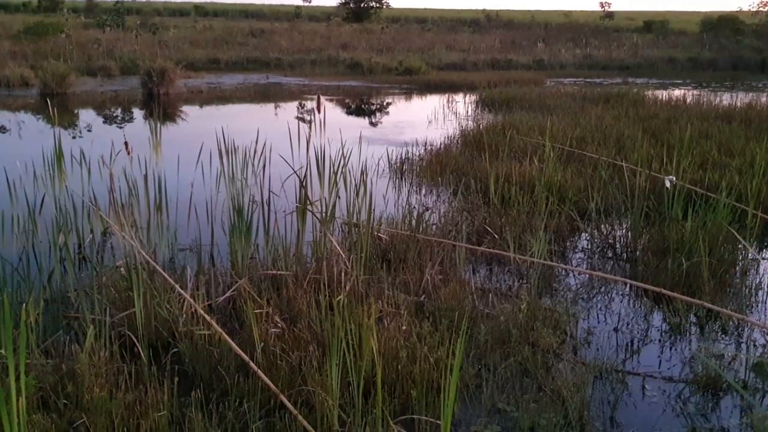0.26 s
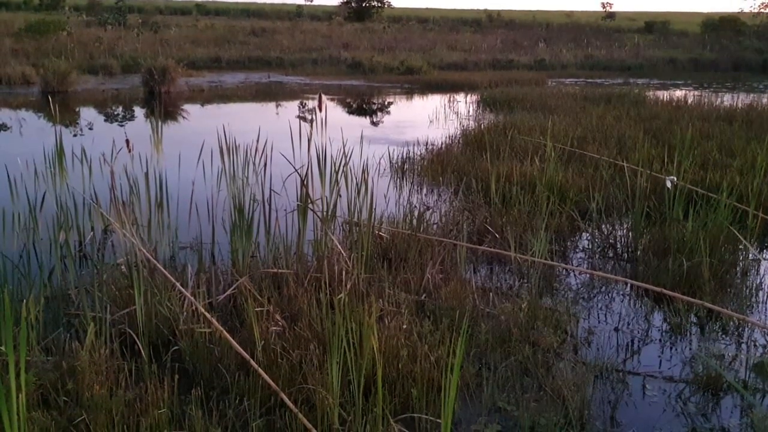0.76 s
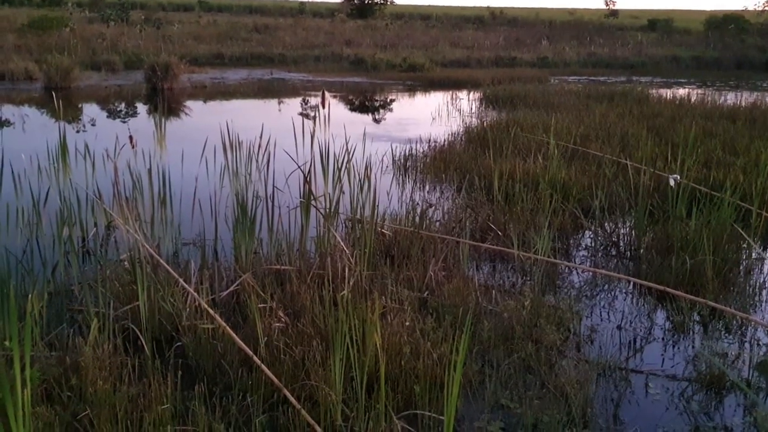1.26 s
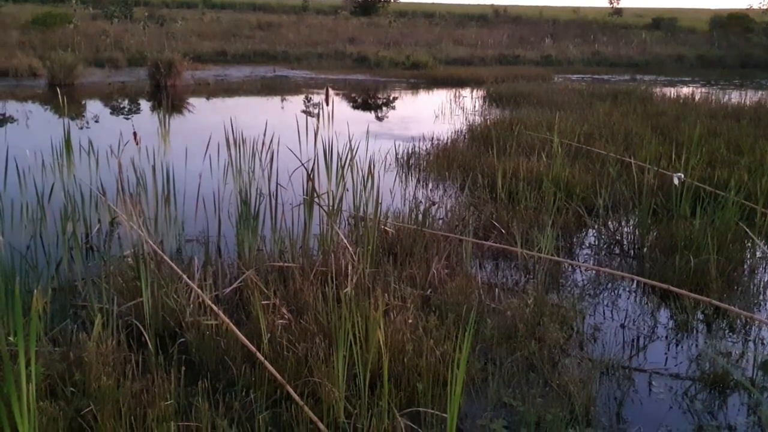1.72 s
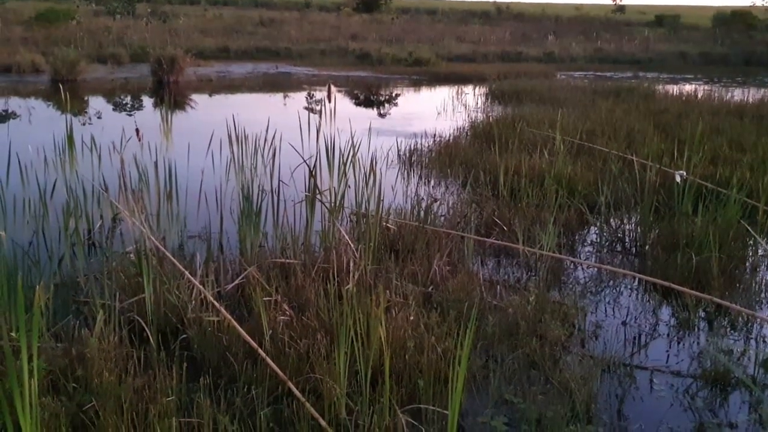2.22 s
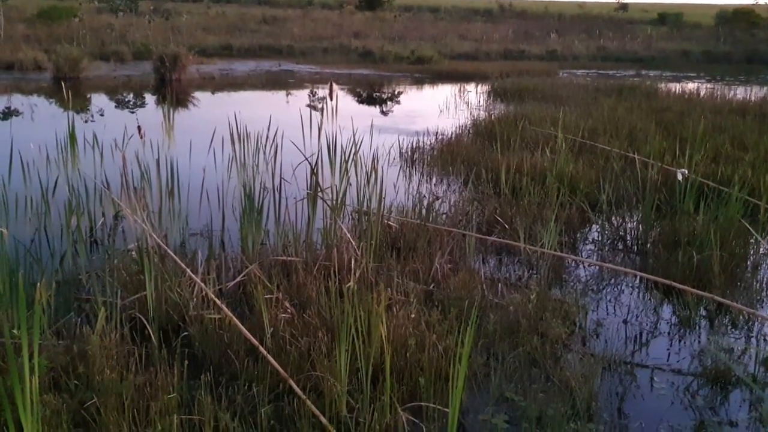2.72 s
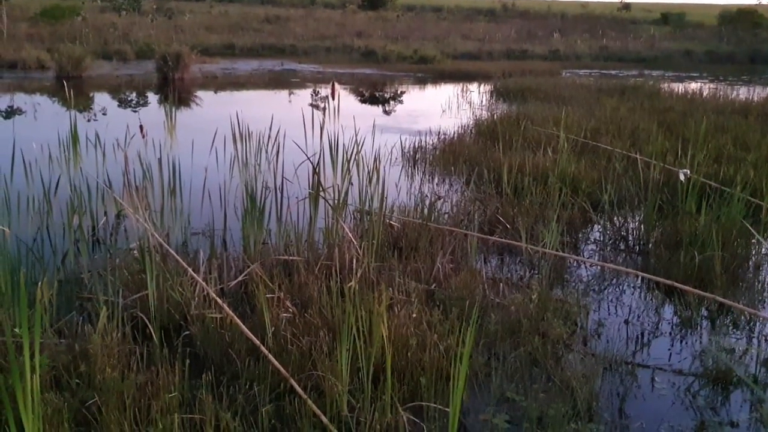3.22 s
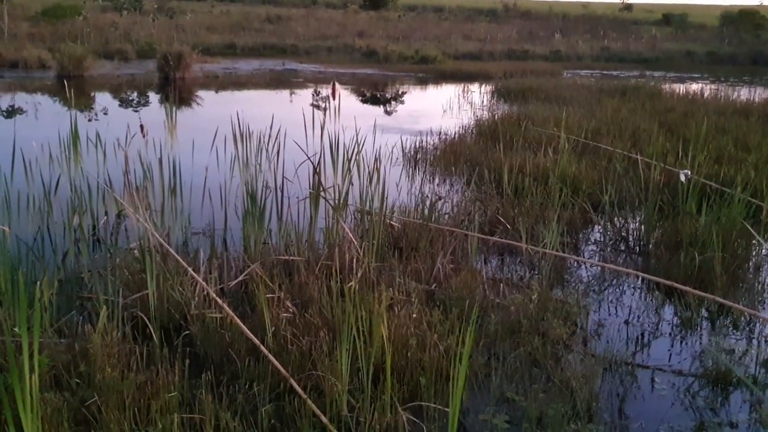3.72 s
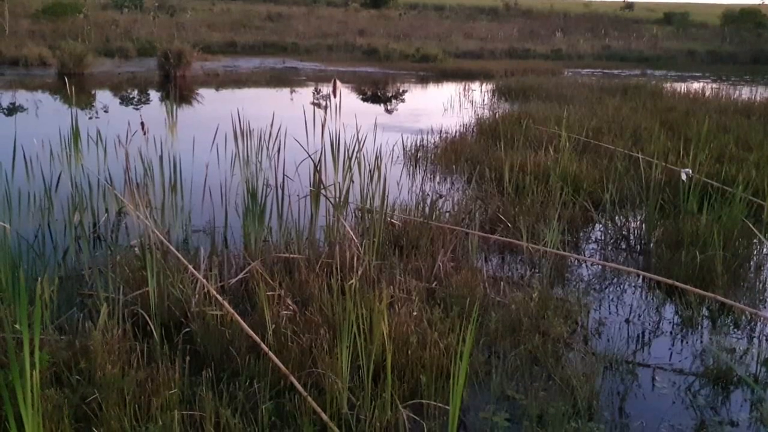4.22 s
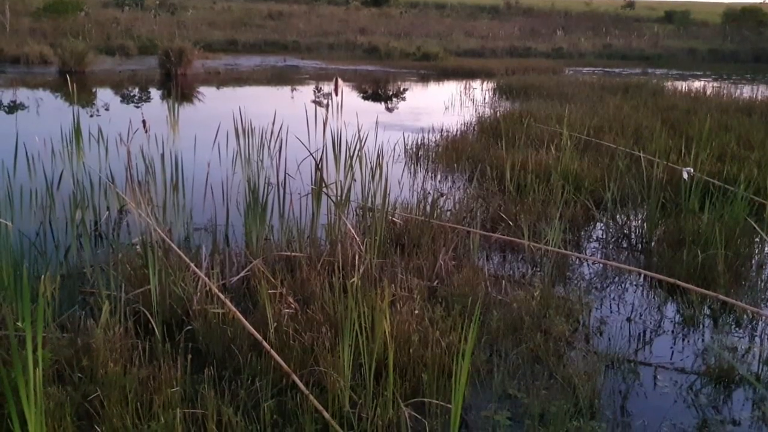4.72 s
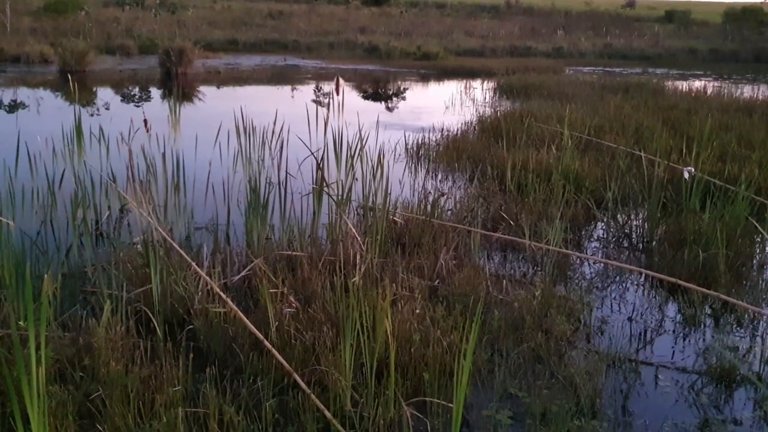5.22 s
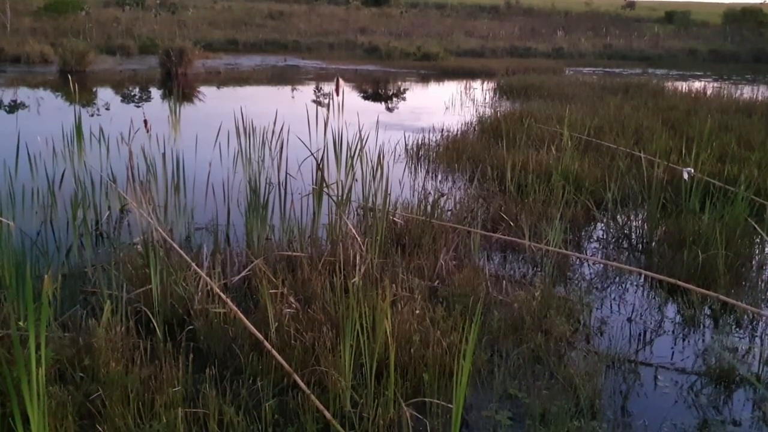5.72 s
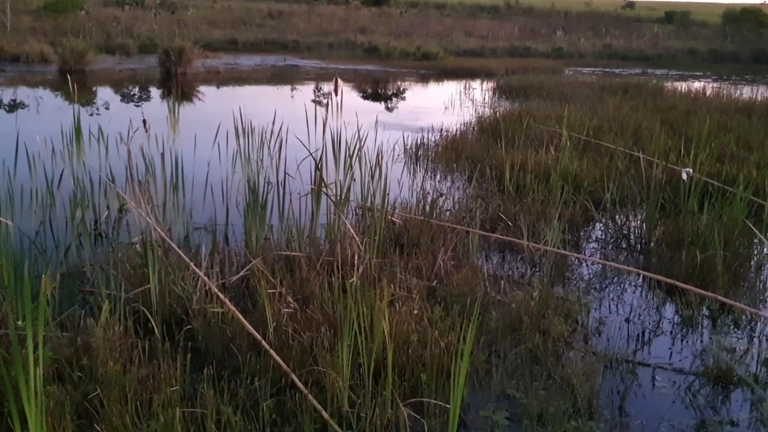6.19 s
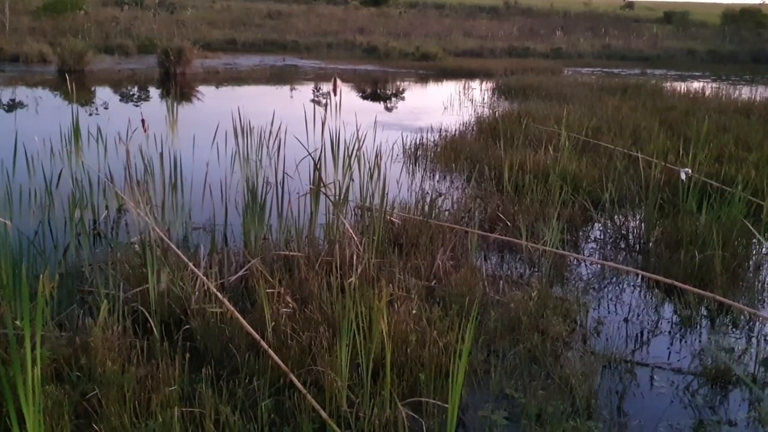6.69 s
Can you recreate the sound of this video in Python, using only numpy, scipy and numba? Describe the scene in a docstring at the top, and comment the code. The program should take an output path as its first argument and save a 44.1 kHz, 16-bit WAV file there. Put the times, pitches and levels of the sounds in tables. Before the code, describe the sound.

Dusk marsh chorus: a near frog's brief rattling croaks, a hoarser rasp answering between, dense buzzing trills all around, thin insect shimmer above.

```python
"""Frog chorus at a reedy lagoon

Dusk: a near frog repeats short rattling croaks, and a hoarser one rasps, mostly between them; both are runs of
brief tone pulses. Around them small frogs buzz in overlapping trills: click trains ringing vocal sac resonances.
Other frogs cluck, whine, squeak and grunt as pulses or sliding tones; far moans and small knocks are shaped noise.
A katydid and a cricket chirr as gated noise. Two closely spaced microphones hear it over faint low air noise."""
import sys
import numpy as np
from scipy import signal
from scipy.fft import rfft, irfft, next_fast_len
from scipy.io import wavfile
from scipy.ndimage import map_coordinates
from numba import njit

SR = 44100
rng = np.random.default_rng(int(sys.argv[2]) if len(sys.argv) > 2 else 0)


def generate_wav(signal):
    """Clip the signal to [-1, 1] and save it as 16-bit WAV at the path in sys.argv[1]."""
    frames = np.transpose(np.atleast_2d(signal))
    scaled = np.clip(frames, -1, 1) * 32767
    pcm = np.round(scaled).astype(np.int16)
    wavfile.write(sys.argv[1], SR, pcm)


N = 306495
T = np.arange(N) / SR  # s


def undb(db):
    """Decibels to gain."""
    return 10 ** (np.asarray(db) / 20)


def unit(x):
    """Scale to rms 1."""
    return x / np.sqrt(np.mean(x ** 2) + 1e-20)


def colour(x, points):
    """Filter by a spectrum of (Hz, dB) points, joined by straight lines over log frequency."""
    hz, db = np.transpose(points)
    size = next_fast_len(N + 4096)
    f = np.maximum(np.arange(size // 2 + 1) * SR / size, 1)
    gain = undb(np.interp(np.log(f), np.log(hz), db))
    return irfft(rfft(x, size) * gain, size)[..., :N]


def walk(rate):
    """Random drift with a spread near 1, heading for a new value rate times a second."""
    knots = rng.standard_normal(2048)
    return np.interp(T * rate, np.arange(len(knots)), knots)


def swell(start, end, edge):
    """A window that opens and closes smoothly over edge seconds."""
    return np.sin(np.pi / 2 * np.clip(np.minimum(T - start, end - T) / edge, 0, 1))


def beat(rate, decay):
    """A gate that snaps open once a cycle and dies away over a share of the cycle."""
    phase = np.cumsum(rate * np.ones(N)) / SR + rng.random()
    return np.exp(-(phase % 1) / decay)


def clicks(rate, scatter_db):
    """One click a cycle, each of its own strength, shared between two samples."""
    phase = np.cumsum(rate) / SR + rng.random()
    cycle = np.floor(phase)
    size = np.diff(cycle, prepend=cycle[0]) * undb(scatter_db * rng.standard_normal(N))
    early = size * np.minimum((phase - cycle) * SR / rate, 1)
    return size - early + np.roll(early, -1)


def flutter(x, gap=.001, stray=.1, after_db=-3.5, count=2):
    """Every click is followed at once by weaker flaps of the membrane; their spacing (gap, s) strays."""
    late = gap * (1 + stray * walk(45))
    flaps = x
    for k in range(1, count + 1):
        flaps = flaps + undb(after_db * k) * map_coordinates(x, [(T - k * late) * SR], order=3)
    return flaps


@njit
def resonate(x, hz, width):
    """Band-pass whose centre may move, gain 1 at the centre."""
    y, b, l = np.empty(len(x)), 0., 0.
    for i in range(len(x)):
        g, k = np.tan(np.pi * hz[i] / SR), width / hz[i]
        v = (b + g * (x[i] + 1e-18 - l)) / (1 + g * (g + k))
        b, l, y[i] = 2 * v - b, l + 2 * g * v, k * v
    return y


def ring(x, hz, width):
    """A resonance that acts twice, so its flanks are steep; rms 1."""
    hz = hz * np.ones(N)
    once = resonate(x, hz, float(width))
    return unit(resonate(once, hz, float(width)))


def add(out, s, hz, db, half):
    """Add one pulse of a vocal sac: a tone under a bell curve whose standard deviation is half seconds."""
    a, b = np.clip([int((s - 5 * half) * SR), int((s + 5 * half) * SR)], 0, N)
    t = T[a:b] - s
    bell = np.exp(-.5 * (t / half) ** 2)
    out[a:b] += undb(db) * bell * np.cos(2 * np.pi * (hz * t + rng.random()))


def slide(start, length, first_hz, last_hz, waver):
    """Phase in radians of a tone that wavers and slides from one pitch to another."""
    hz = np.interp(T, [start, start + length], [first_hz, last_hz]) * (1 + waver * walk(200))
    return 2 * np.pi * np.cumsum(hz) / SR


def outdoors(x, lag, pan_db, wet_db, t60):
    """The direct sound reaches the right microphone lag samples late; reeds scatter a short tail to both."""
    t = T[:SR // 4]
    tail = rng.standard_normal((2, len(t))) * np.exp(-np.log(1000) * t / t60) * (t > .002)
    tail /= np.sqrt(np.sum(tail ** 2, axis=1, keepdims=True))
    direct = np.array([x, np.roll(x, int(round(lag)))])
    scattered = signal.oaconvolve(np.float32(x[None]), np.float32(tail), axes=1)[:, :N]
    both = direct + undb(wet_db) * scattered
    pan = undb(np.array([[pan_db], [-pan_db]]) / 2)  # pan_db is left minus right
    return both * pan / np.hypot(1, undb(wet_db))


def air():
    """Faint steady outdoor noise, more alike on the two sides in the bass than in the treble."""
    # relative spectrum of the air: (frequency [Hz], level [dB])
    air_spectrum = [(20, -21), (45, -8), (68, 1), (85, -2.5), (110, -3.5), (140, -9), (250, -8.5),
                    (400, -7.5), (560, -7), (750, -8), (1100, -10), (1500, -14.5), (2000, -18), (6000, -21),
                    (15000, -30)]
    mid, side = rng.standard_normal((2, N))
    width = colour(side, [(30, -3), (70, -5.0), (300, -5.0), (700, 4.0)])
    noise = mid + width * np.array([[1], [-1]])
    return undb(-62.5) * unit(colour(noise, air_spectrum))


def far_chorus(wash_db=-3, count=5):
    """Farther frogs buzz as click trains at their own rates; the farthest merge into a wash of noise."""
    # overall level of the distant chorus: (time [s], level [dB])
    chorus_level = [(0.0, -33.5), (0.39, -32.5), (0.87, -35.5), (1.31, -32), (1.64, -35.5), (2.2, -32),
                    (3.0, -38.5), (3.62, -37), (4.08, -37), (4.39, -34.5), (4.97, -36.5), (5.21, -31.5),
                    (5.87, -32.5), (5.96, -35.5), (6.7, -34), (6.95, -36.5)]
    # relative spectrum of the distant chorus: (frequency [Hz], level [dB])
    far_sac = [(700, -41.5), (1500, -25), (2000, -28.5), (2400, -22), (3000, -9.5), (3350, -5),
               (3700, -4.5), (4100, 0), (4700, -1), (5350, -2.5), (5900, -14), (6400, -29), (7700, -41),
               (9000, -28.5), (10500, -26.5)]
    pulses = 0
    for _ in range(count):
        rate = (119 + 14 * rng.random()) * (1 + .02 * walk(1.5) + .0035 * walk(90))  # pulses per s
        pulses = pulses + clicks(rate, scatter_db=0.0) * undb(0.49 * walk(1.84))
    buzzers = outdoors(unit(pulses), lag=19, pan_db=-0.5, wet_db=-3.5, t60=0.38)
    spread = buzzers + undb(wash_db) * rng.standard_normal((2, N))
    return unit(colour(spread, far_sac)) * undb(np.interp(T, *np.transpose(chorus_level)))


def pond_trills(rise=0.11, upper_ratio=1.158, width_hz=560, upper_width_hz=620, throat_hz=2750, throat_width_hz=600):
    """Pulses ring the throat and two resonances of a vocal sac; as it tightens the pitch climbs and the pulses slow."""
    # buzzing frogs across the pond: (start [s], end [s], first pulse rate [1/s], final pitch [Hz],
    # level of the main resonance [dB], upper resonance relative to the main one [dB],
    # throat relative to the main one [dB], left minus right [dB])
    trill_calls = [(-.45, 0.697, 134, 4660, -36, -1.5, -31, 2.5),
                   (.68, 1.67, 129, 4444, -36.5, -3.5, -14.5, 0),
                   (1.6, 2.674, 138, 4500, -37, -3.5, -32, 3.5),
                   (1.65, 2.748, 127, 4640, -37.5, -3, -12, 1),
                   (2.55, 3.404, 123, 4260, -44, -5.5, -33, 13.5),
                   (3.15, 4.144, 141, 4520, -40.5, -13.5, -42, 9),
                   (4.1, 4.753, 133, 4440, -40.5, -10, -19, 10),
                   (4.25, 5.049, 133, 4870, -39.5, -4, -24, 2.5),
                   (4.95, 5.997, 138, 4550, -34, -1.5, -16, 4.5),
                   (5.98, 7.155, 140, 4450, -39, -4.5, -17.5, 6)]
    # tilt of all their voices, a lift near 5.7 kHz and a cut above: (frequency [Hz], level [dB])
    trill_top = [(5300, -1.5), (5700, 3.5), (6300, -6.5)]
    slowing, edge = .08, 0.26  # share of the pulse rate lost by the end; rise and fall [s]
    out = 0
    for start, end, rate, top_hz, db, upper_db, throat_db, pan_db in trill_calls:
        done = np.clip((T - start) / (end - start), 0, 1)
        pulses = clicks(rate * (1 - slowing * done) * (1 + .001 * walk(70)), scatter_db=1)
        flaps = flutter(pulses)
        slack = rise * (1 - done) ** 2.6
        main = ring(flaps, top_hz * (1 - slack), width_hz)
        upper = ring(flaps, upper_ratio * top_hz * (1 - slack / 2), upper_width_hz)
        throat = ring(pulses, throat_hz, throat_width_hz)
        voice = undb(db) * (main + undb(upper_db) * upper + undb(throat_db) * throat)
        voice = voice * swell(start, end, edge)
        out = out + outdoors(voice, lag=19, pan_db=pan_db, wet_db=-2.5, t60=0.097)
    return colour(out, trill_top)


def near_trills(first_rate=133, last_rate=118.8):
    """Long bright buzzes: sharp pulses (rates per s) that slow down as the frog runs out of air."""
    # the nearest, brightest buzzer: (start [s], end [s], level [dB])
    near_calls = [(-.25, 0.91, -34.5), (5.038, 6.139, -34.5)]
    # relative spectrum of its vocal sac: (frequency [Hz], level [dB])
    trill_sac = [(600, -42), (1500, -25), (2400, -26.5), (2800, -17), (3150, -4.5), (3400, -3.5),
                 (3700, -9), (4300, -2.5), (4900, 1.5), (5500, -7), (5900, -10.5), (6300, -12.5),
                 (7000, -22), (7700, -43), (8800, -21), (9600, -26.5), (10500, -50)]
    out = 0
    for start, end, db in near_calls:
        left = np.clip((end - T) / (end - start), 0, 1)  # share of the call still to come
        rate = last_rate + (first_rate - last_rate) * left ** 1.5
        pulses = clicks(rate * (1 + .0008 * walk(60)), scatter_db=1)
        voice = unit(colour(flutter(pulses), trill_sac))
        out = out + undb(db) * voice * swell(start, end, 0.23)
    return outdoors(out, lag=24, pan_db=-5.5, wet_db=-8.5, t60=0.042)


def katydid(stroke_rate=82, left_db=-3.5, right_db=2.5):
    """Very high wing strokes, scraped noise plus ticks at the same rate, surging in rapid chirps."""
    # level before the left and right offsets: (time [s], level [dB])
    katydid_level = [(0.0, -55.5), (3.06, -54), (5.15, -52), (6.87, -54.5), (6.95, -52)]
    # relative spectrum of the wings: (frequency [Hz], level [dB])
    katydid_wing = [(2500, -32), (6500, -8.5), (8000, -14.5), (9600, -10), (10800, -7.5), (11700, -3),
                    (12150, 2), (12380, -3), (12500, 2), (12800, 2), (13350, 1), (13550, -12), (14100, -9),
                    (14700, -53)]
    cycle = np.cumsum(13.5 * (1 + .03 * walk(6))) / SR % 1  # about 13.5 chirps per s
    chirps = .7 + np.clip(np.minimum(cycle / .04, (.85 - cycle) / .2), 0, 1)
    rate = stroke_rate * (1 + 0.039 * walk(30))
    scrape = unit(rng.standard_normal((2, N)) * (.4 + beat(rate, decay=.5)))
    ticks = undb(-4) * outdoors(unit(clicks(rate, scatter_db=2)), lag=-5, pan_db=0, wet_db=0, t60=.015)
    unsteady = undb(.4 * walk(10) + .8 * walk(5))
    wings = colour((scrape + ticks) * chirps * unsteady, katydid_wing)
    level_db = np.interp(T, *np.transpose(katydid_level))
    return unit(wings) * undb(level_db + np.array([[left_db], [right_db]]))


def hoarse_frog(rate=41, beats=3, edge_db=13, uneven_db=1.0, jitter=0.001407, rasp_db=12.5):
    """A note swells and fades over a few beats; each beat is a quick rattle of throat pulses at different pitches."""
    # notes: (middle [s], level before the rasp_db gain [dB])
    rasps = [(0.085, -43.5), (.485, -43.5), (0.875, -45.5), (1.29, -47), (1.728, -49.5), (2.21, -45),
             (2.64, -50.5), (3.0, -52), (3.68, -47.5), (3.951, -53), (4.05, -47), (4.14, -45), (4.492, -43),
             (4.84, -44), (5.295, -46), (5.49, -50.5), (5.689, -47), (5.93, -44), (6.145, -45.5),
             (6.575, -44)]
    # pulses in one beat of the throat: (mean pitch [Hz], level relative to the note [dB],
    # half length [s], delay [s], scatter of its pitch [share])
    rasp_throat = [(2210, 0, 0.00097, 0.001114, 0.043), (1760, -8.5, 0.0012, 0.002004, 0.035),
                   (2020, -2.5, 0.00054, .005, 0.084), (2390, -1.5, 0.00078, 0.0042, 0.028),
                   (2170, -5.5, 0.00096, 0.013, 0.047), (1800, -13.5, .0012, 0.011, .04),
                   (2210, -3.5, 0.0007, 0.017, .04), (2400, -7, 0.00054, 0.023, 0.032),
                   (724, -15.5, 0.003, 0.00232, 0.024)]
    out = np.zeros(N)
    for s, db in rasps:
        for k in range(-beats, beats + 1):  # beats on each side of the middle
            beat_db = db - edge_db * (k / beats) ** 2
            for hz, part_db, half, delay, scatter in rasp_throat:
                late, sharp, loud = rng.standard_normal(3)
                when = s + k / rate + delay + jitter * late
                add(out, when, hz * (1 + scatter * sharp), beat_db + part_db + uneven_db * loud, half)
    return undb(rasp_db) * outdoors(out, lag=19.4, pan_db=-6.0, wet_db=-3, t60=0.17)


def whining_frogs(length=0.19, first_hz=711, last_hz=435, waver=0.0604, uneven_db=1.0):
    """Thin far tones, unsteady in pitch and level, that slide down, quickly at first."""
    # falling whines: (start [s], level [dB])
    whines = [(.13, -66.5), (1.0, -63.5), (1.8, -71), (2.58, -67), (4.08, -64.5), (4.87, -69),
              (5.70, -61.5), (6.51, -67.5)]
    out = np.zeros(N)
    for s, db in whines:
        on = (T > s) & (T < s + length)
        done = (T[on] - s) / length
        hz = (last_hz + (first_hz - last_hz) * (1 - done) ** 2) * (1 + waver * walk(90)[on])
        shape = np.sin(np.pi * done) ** .5 * undb(uneven_db * walk(60)[on])
        out[on] += undb(db) * shape * np.sin(2 * np.pi * np.cumsum(hz) / SR)
    return outdoors(out, lag=19, pan_db=-9.5, wet_db=-6.0, t60=0.74)


def near_frog(croak_hz=2445, climb=0.0016, fade_db=1.5, stutter_climb=1600, stutter_grow=38):
    """A croak is a run of rattling pulses that swells, climbs a little and fades; a stutter stumbles upwards."""
    # croaks: (strongest pulse [s], pulse rate [1/s], level [dB], pulses before it, pulses after it)
    croaks = [(0.3235, 39.5, -17.5, 3, 2), (.697, 40, -18, 3, 2), (1.1153, 39.5, -17.5, 3, 2),
              (1.5331, 39.3, -18.7, 3, 2), (2.023, 38, -19, 3, 1), (3.797, 41, -24.5, 0, 1),
              (4.2285, 40.5, -16.5, 3, 1), (4.5292, 39.7, -16, 2, 3), (5.1295, 39.3, -18.5, 2, 2),
              (6.049, 42, -25, 0, 1), (6.364, 40, -16.5, 2, 2), (6.8005, 39.7, -16.5, 3, 2)]
    # partials of a pulse and the weak rattle around it: (share of the sac's pitch, relative level [dB],
    # half length [s], mean lead [s], scatter of its pitch [share])
    croak_partials = [(0.98, -7, 0.0021, 0, 0.0085), (0.683, -26.5, 0.0031, 0, 0.034),
                      (0.92, -17.5, 0.00053, 0.0055, 0.034), (0.331, -29.5, 0.002, 0.0018, 0.061),
                      (0.99, -11, 0.00073, 0.0015, 0.027), (0.96, -13, 0.0011, .0125, 0.034),
                      (0.95, -19, 0.0013, -.0065, 0.033), (0.94, -19.5, 0.0015, -0.011, 0.033)]
    # quick rising stutters that open a bout: (last pulse [s], level [dB])
    stutters = [(3.757, -21), (6.007, -21.5)]
    # the stumbling rhythm of every stutter: time before its last pulse [s]
    stutter_rhythm = [.126, .114, .077, .059, .04, .026, .007, 0]
    pulses, out = [], np.zeros(N)
    for s, rate, db, before, after in croaks:
        for k in range(-int(round(before)), int(round(after)) + 1):
            pulses.append((s + k / rate, croak_hz * (1 + climb * k), db - fade_db * abs(k) ** 1.61))
    for s, db in stutters:
        for early in stutter_rhythm:  # climbs in Hz per s, grows in dB per s
            pulses.append((s - early, croak_hz - stutter_climb * early, db - stutter_grow * early))
    for s, hz, db in pulses:
        for share, part_db, half, lead, scatter in croak_partials:
            sharp, late = rng.standard_normal(2)
            when = s - lead * (1 + 0.0813 * late)
            add(out, when, hz * share * (1 + scatter * sharp), db + part_db, half)
    return outdoors(out, lag=19, pan_db=-4, wet_db=-9, t60=.24)


def clucking_frog(rate=39, middle_hz=845, sag_hz_per_s=800, edge_db=8):
    """Five low pulses in quick succession, strongest in the middle and sinking in pitch, with some scatter."""
    # clucks: (middle [s], level [dB])
    clucks = [(.345, -38.5), (.765, -39.5), (1.12, -39), (3.897, -39), (4.389, -38), (4.827, -37.5),
              (5.176, -40.5), (5.604, -39)]
    out = np.zeros(N)
    for s, db in clucks:
        for k in range(-2, 3):
            hz = (middle_hz - sag_hz_per_s * k / rate) * (1 + .035 * rng.standard_normal())
            add(out, s + k / rate, hz, db - edge_db * (k / 2) ** 2, .003)
    return outdoors(out, lag=17, pan_db=1, wet_db=-5, t60=0.3)


def far_moans(width_hz=170, edge=0.29):
    """Low moans from far across the marsh: noise through a narrow resonance, unsteady in level."""
    # moans: (start [s], end [s], level [dB], centre [Hz])
    moan_calls = [(0.97, 1.547, -70, 430), (2.643, 3.17, -70, 360), (3.157, 3.6, -72.5, 412),
                  (5.595, 6.435, -67, 380)]
    out = np.zeros(N)
    for start, end, db, hz in moan_calls:
        out += undb(db) * swell(start, end, edge) * ring(rng.standard_normal(N), hz, width_hz)
    return out * undb(2 * walk(22))


def knocks(decay=0.019):
    """Small dull knocks among the reeds: bursts of filtered noise that die away over decay seconds."""
    # knocks: (time [s], level [dB], peak of the spectrum [Hz])
    knock_hits = [(1.428, -56, 520), (1.957, -55.5, 527), (2.458, -49, 1160), (3.671, -49, 1210),
                  (5.609, -56.5, 260)]
    out = np.zeros(N)
    for s, db, hz in knock_hits:
        spectrum = [(hz / 10, -12), (hz, 0), (hz * 2, -3), (hz * 8, -40)]
        body = unit(colour(rng.standard_normal(N), spectrum))
        out += undb(db) * body * (T > s - .002) * np.exp(-abs(T - s) / decay)
    return outdoors(out, lag=2, pan_db=-1, wet_db=-4, t60=0.12)


def grunt(start=1.925, length=0.047, level_db=-55.5, first_hz=480, last_hz=387, waver=.03, octave_db=6):
    """One short falling grunt whose strong octave dies first."""
    phase = slide(start, length, first_hz, last_hz, waver)
    octave = undb(octave_db) * np.sin(2 * phase) * swell(start, start + 0.76 * length, 0.0083)
    voice = (np.sin(phase) + octave) * swell(start, start + length, 0.0092)
    return outdoors(undb(level_db) * voice, lag=5.5, pan_db=5, wet_db=-3, t60=.16)


def squeaks(first_hz=2150, last_hz=1984, waver=0.041, edge=0.01):
    """Brief strained tones near the start of a bout, wavering as they slide down."""
    # squeaks: (start [s], length [s], level [dB])
    squeak_calls = [(3.64, 0.03, -47), (4.038, 0.061, -42), (5.891, 0.04, -43)]
    out = np.zeros(N)
    for s, length, db in squeak_calls:
        tone = np.sin(slide(s, length, first_hz, last_hz, waver))
        out += undb(db) * tone * swell(s, s + length, edge)
    return outdoors(out, lag=18.7, pan_db=-7, wet_db=2, t60=0.24)


def cricket(stroke_rate=65):
    """A thin, even trill of noise, gated once a wing stroke, that sets in late."""
    # relative spectrum of the wings: (frequency [Hz], level [dB])
    cricket_wing = [(3000, -39), (7800, -12), (8600, -4.5), (8960, 2), (9250, -5), (10000, -13.5)]
    wings = colour(rng.standard_normal((2, N)) * beat(stroke_rate, decay=1.0), cricket_wing)
    return unit(wings) * swell(4.48, 7.8, 0.75) * undb(-56.0)


def scene():
    """All the callers around the lagoon, over the air."""
    buzzers = far_chorus() + pond_trills() + near_trills()
    croakers = hoarse_frog() + whining_frogs() + near_frog() + clucking_frog() + grunt() + squeaks()
    insects = katydid() + cricket()
    return air() + buzzers + insects + croakers + far_moans() + knocks()


def record(dry, top_hz=14600):
    """The recorder cuts the top with a steep low-pass."""
    return signal.sosfilt(signal.ellip(10, .2, 80, top_hz, fs=SR, output="sos"), dry)


dry = scene()
out = record(dry)
generate_wav(out)
```